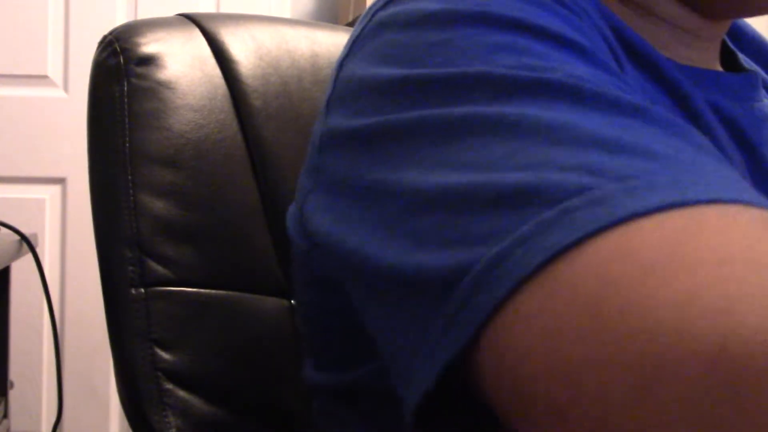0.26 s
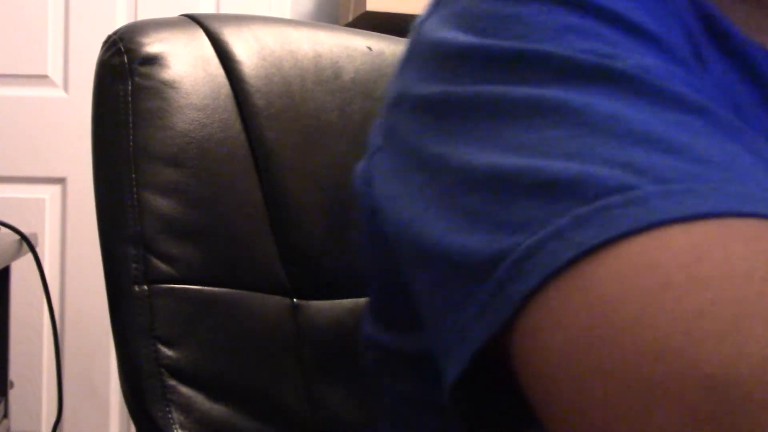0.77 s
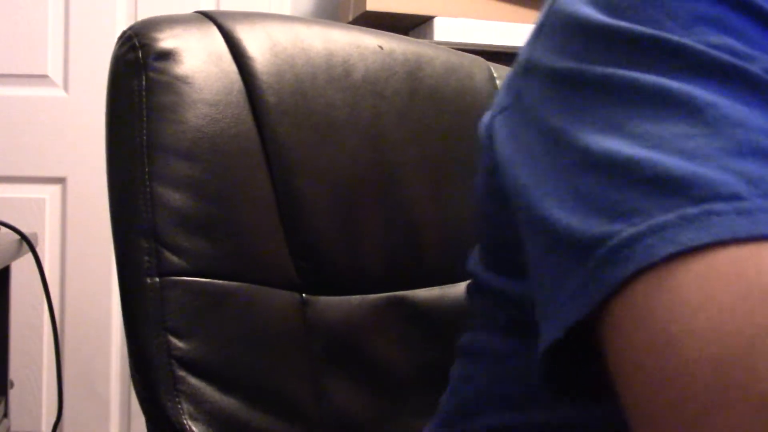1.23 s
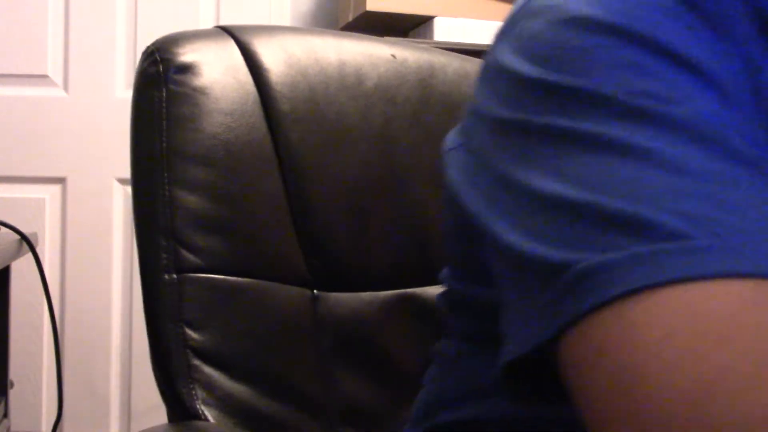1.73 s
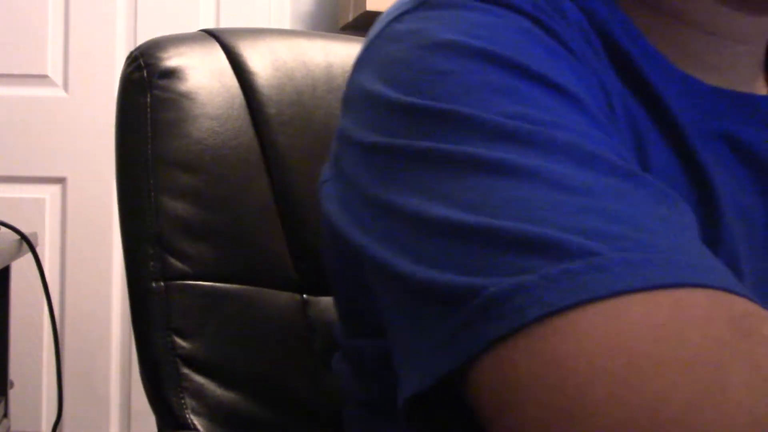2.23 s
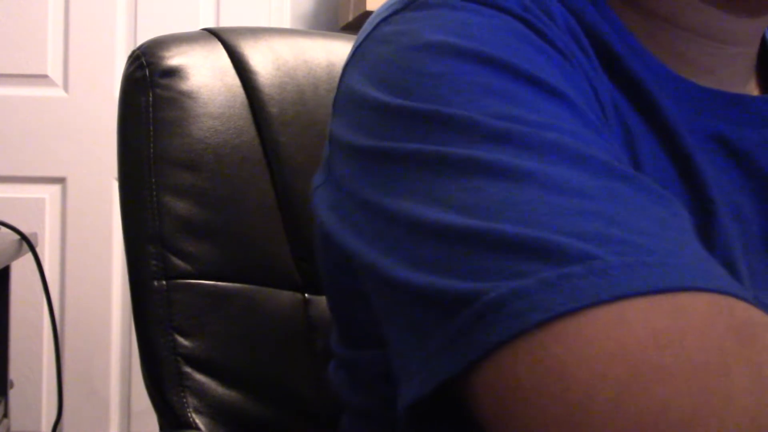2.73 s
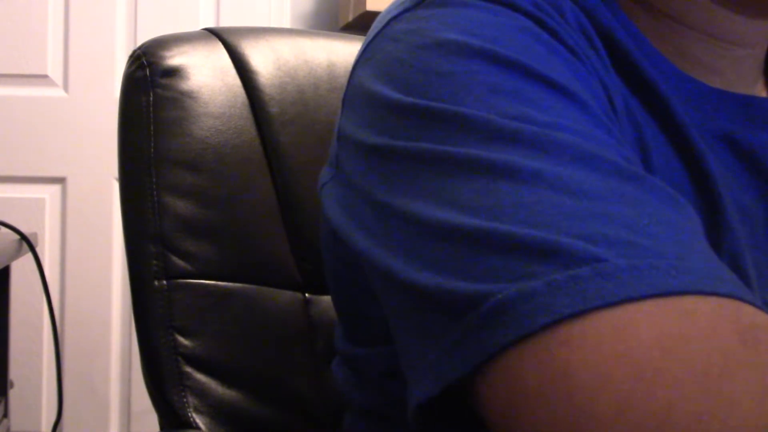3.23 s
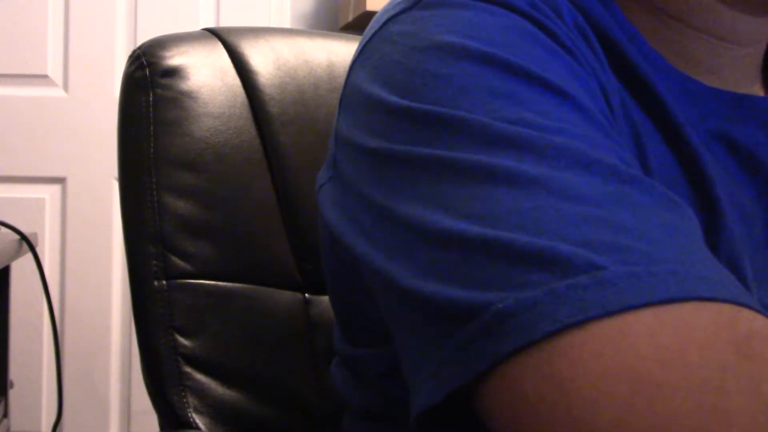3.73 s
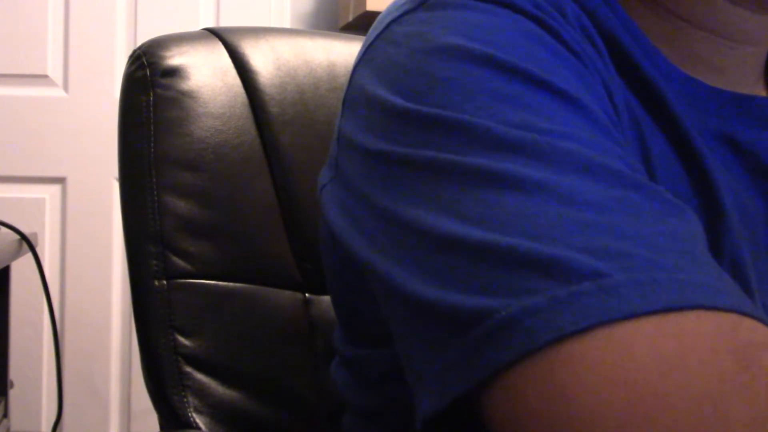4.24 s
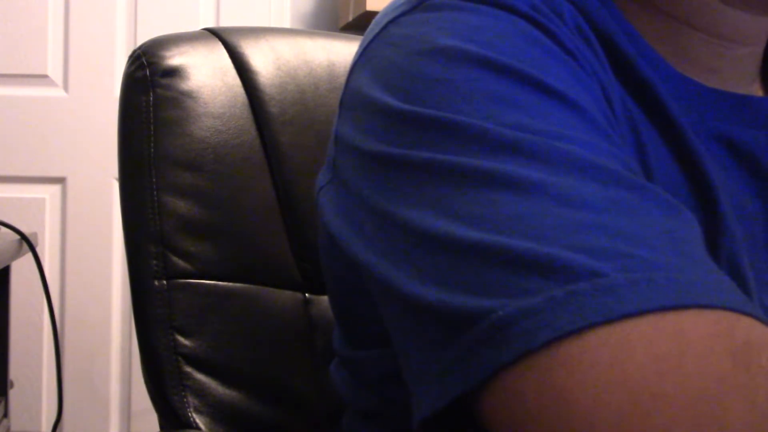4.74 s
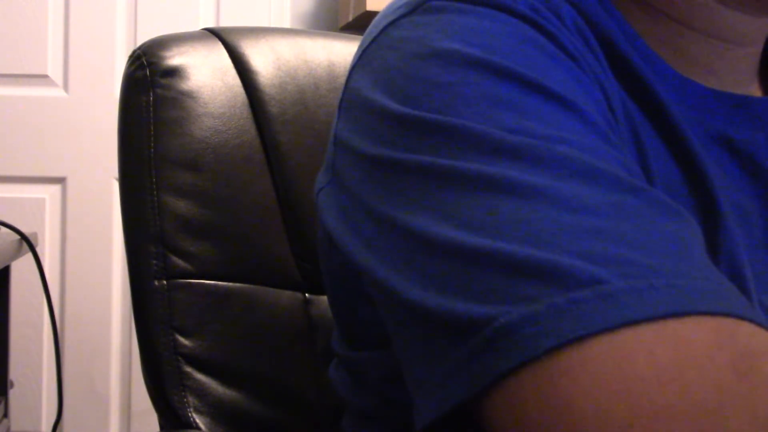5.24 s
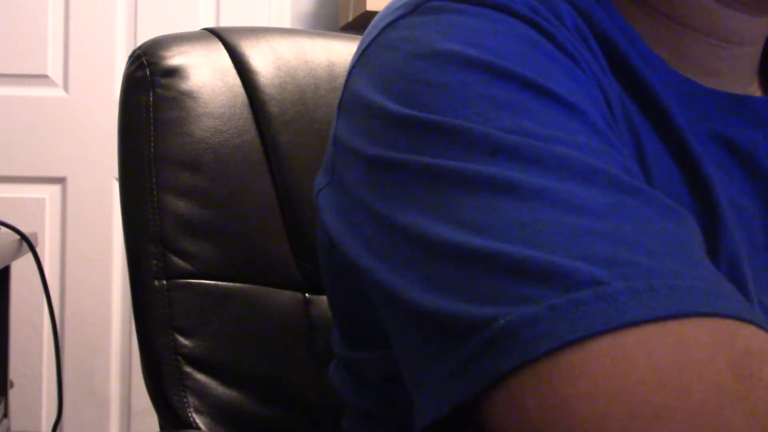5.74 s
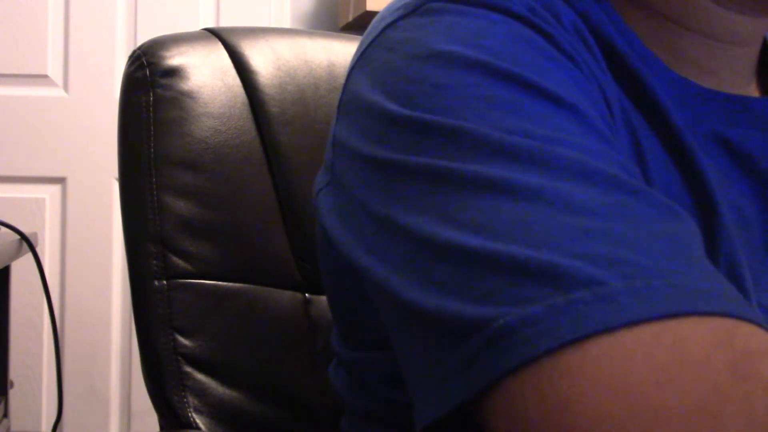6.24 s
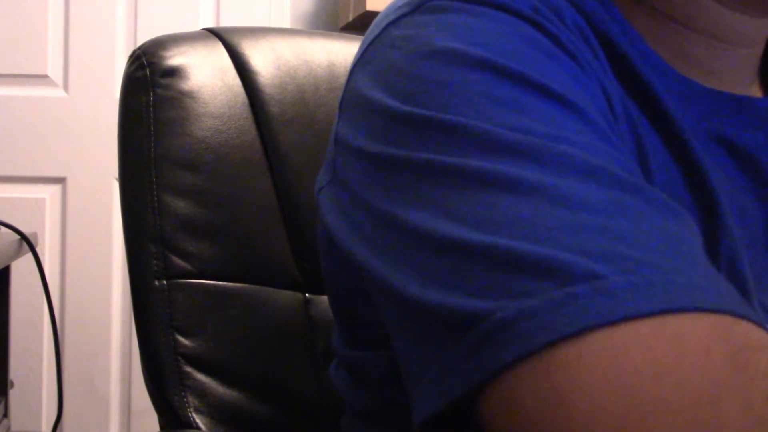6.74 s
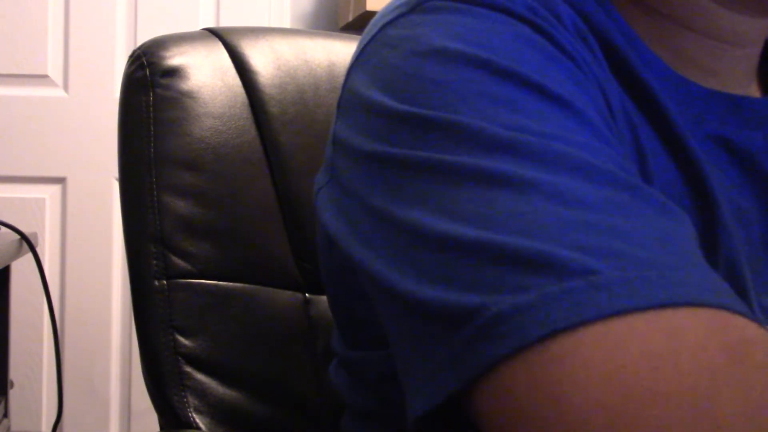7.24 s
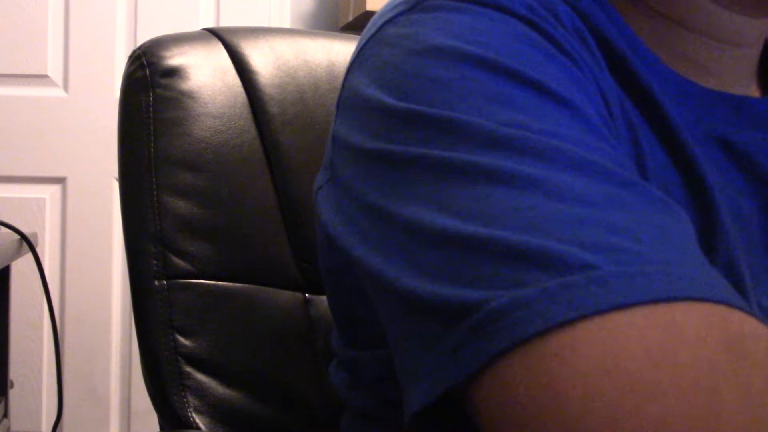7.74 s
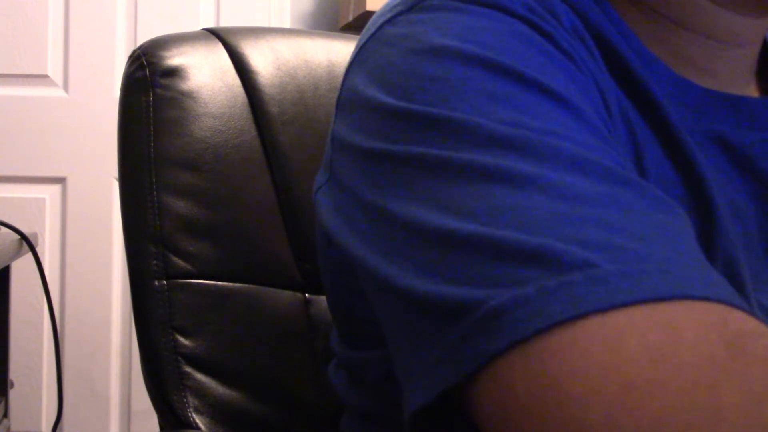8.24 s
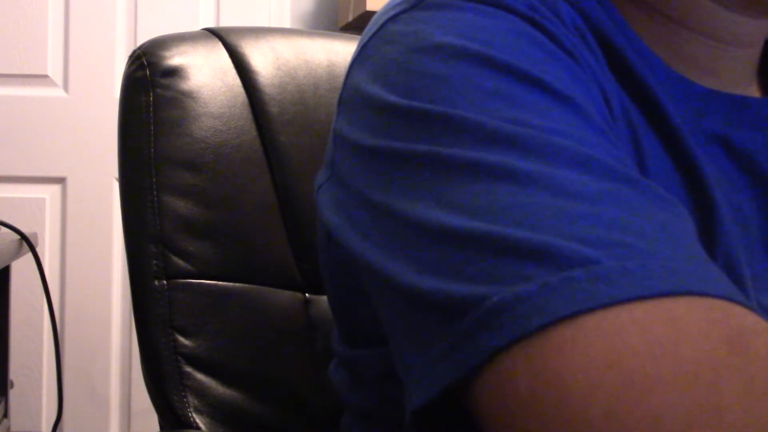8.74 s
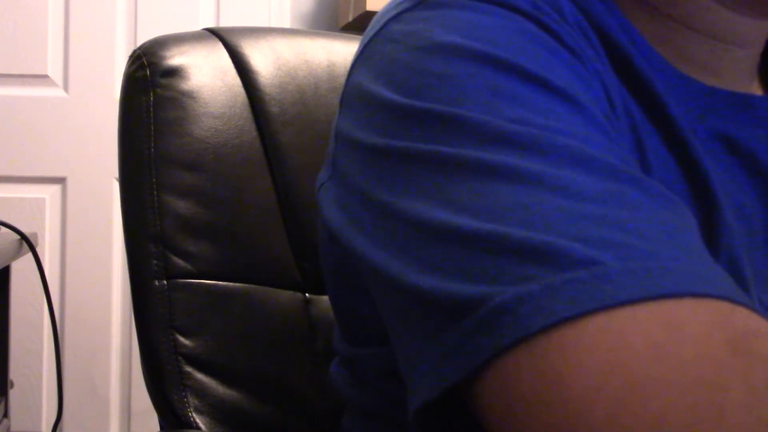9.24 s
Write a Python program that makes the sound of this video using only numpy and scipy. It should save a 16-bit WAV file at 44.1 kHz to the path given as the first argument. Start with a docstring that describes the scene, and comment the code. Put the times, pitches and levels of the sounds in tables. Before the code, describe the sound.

Close, dry typing on a clicky keyboard: each key knocks down with a small bright switch click, then springs back with a louder clack about a tenth of a second later. A sleeve rustles early and fades. Strokes come irregularly, with a quieter middle of faint taps and soft bumps, then firmer, busier typing. A low fan murmurs throughout a small indoor room.

```python
"""A fan hums throughout as shaped noise with fuzzy tones, in a small, quiet room. From the start a sleeve slides
over a chair as the typist leans across: cloth noise that wavers and then sinks to a faint rustle.
Short, irregular typing begins at once: bursts of chatter, coloured by case, desk and key, knock as each key goes
down and comes back up, and its switch clicks both ways. About a second later come loose finger taps and soft low
bumps (short decaying sines): the desk under some hard key presses, and chair, arm or wrist."""
import sys
import numpy as np
from scipy import signal
from scipy.fft import rfft, irfft
from scipy.io import wavfile
from scipy.ndimage import uniform_filter1d

SR = 44100
rng = np.random.default_rng(int(sys.argv[2]) if len(sys.argv) > 2 else 0)


def to_wav(sig):
    """Store sig (one row per channel, or 1-D mono) as 16-bit WAV at the path in sys.argv[1].

    Samples outside -1..1 are clipped; the rate is SR.
    """
    pcm = np.clip(np.atleast_2d(sig), -1, 1) * 32767
    pcm = np.round(pcm).astype(np.int16)
    wavfile.write(sys.argv[1], SR, pcm.T)  # frames by channels


N = 418509

SIZE = 16384  # samples in one short sound
HZ, AGE = np.fft.rfftfreq(SIZE, 1 / SR), np.arange(SIZE) / SR  # its frequencies [Hz] and running time [s]
FADE = signal.windows.tukey(2 * SIZE, .3)[SIZE:]  # eases its last 30 % down to silence


def amp(db):
    """Decibels to gain."""
    return 10 ** (np.asarray(db) / 20)


def evened(x):
    """Scales to rms 1."""
    return x / np.sqrt(np.mean(x ** 2) + 1e-20)


def unit(x):
    """Scales to energy 1."""
    return x / np.linalg.norm(x, axis=-1, keepdims=True)


def read(points, hz):
    """Joins (frequency [Hz], value) points on a log-frequency axis."""
    f, value = np.transpose(points)
    return np.interp(np.log(hz + 1), np.log(f + 1), value)


def lift(modes, hz):
    """The dB that resonances add to a spectrum; a negative lift is a dip."""
    total_db = 0
    for f, width, db in modes:
        detuning = 2 * (hz - f) / width
        total_db = total_db + 10 * np.log10(1 + (amp(db) ** 2 - 1) / (1 + detuning ** 2))
    return total_db


def add(mix, s, sound):
    """Mixes a sound in at time s [s]."""
    start = max(round(s * SR), 0)
    part = mix[:, start:][:, :sound.shape[1]]
    part += sound[:, :part.shape[1]]


def noise(colour_db, width):
    """Mid and side of steady noise with a given spectrum; the mid has rms 1."""
    hz = np.fft.rfftfreq(N, 1 / SR)
    mid, side = rfft(rng.standard_normal((2, N))) * amp(colour_db(hz))
    side = side * amp(read(width, hz))
    pair = irfft(np.array([mid, side]), N)
    return pair / pair[0].std()


# colour of fan and room air: (frequency [Hz], relative level per Hz [dB])
AIR_COLOUR = [(15, -63), (25, -25.5), (127, -9), (195, -11.5), (236, -5), (363, -9.5), (427, -15),
              (463, -8.5), (734, -16), (988, -15.5), (1100, -25), (1370, -17.5), (2160, -26), (3340, -25.5),
              (16000, -40.5)]
# fuzzy tones of the fan: (frequency [Hz], width [Hz], lift [dB])
FAN_TONES = [(142, 10, 2.2), (231, 4.6, 10.4), (358.5, 10, 4.2), (654, 19, 3.1), (1007, 57, 9.4),
             (1380, 46, 4.2), (1670, 87, 5.4), (3390, 29, 9)]
# stereo spread of the air: (frequency [Hz], side level [dB])
AIR_WIDTH = [(60, -18), (110, -12.5), (200, -17), (380, -10.5), (700, -9), (1290, -14.5), (2380, -5),
             (4400, -12), (8120, -13), (15000, -24.5)]
AIR_DB = -56  # rms of the mid, re full scale


def fan():
    """Soft moving air with a few fuzzy tones, as noise lifted by narrow resonances."""
    return amp(AIR_DB) * noise(lambda hz: read(AIR_COLOUR, hz) + lift(FAN_TONES, hz), AIR_WIDTH)


# sweep of the sleeve over the chair: (time [s], level [dB])
SLEEVE_SLIDE = [(0, -48), (.6, -56.5), (.9, -49.5), (1.3, -48), (1.6, -57.5), (2.25, -54), (2.7, -65.5)]
# colour of the rubbing cloth: (frequency [Hz], relative level per Hz [dB])
CLOTH_COLOUR = [(40, -25), (120, -2), (220, -1), (480, 5), (800, 0), (1300, -0.5), (2500, -6), (4000, -16),
                (7000, -18.5), (11000, -29.5), (16000, -46)]
# how much the room differs between the two microphones, also for strikes: (frequency [Hz], side level [dB])
ROOM_WIDTH = [(200, -25), (1000, -19.5), (2500, -15.5), (5000, -10), (12000, -7)]


def sleeve(catch_db=0.75):
    """Cloth slides over the chair back, catching a little as its level wavers."""
    slide_db = np.interp(np.arange(N) / SR, *np.transpose(SLEEVE_SLIDE))
    catches = evened(uniform_filter1d(rng.standard_normal(N), size=900))
    return amp(slide_db + catch_db * catches) * noise(lambda hz: read(CLOTH_COLOUR, hz), ROOM_WIDTH)


def causal(db):
    """The response that rings only after the blow, for a dB spectrum."""
    log_gain = np.log(amp(np.r_[db, db[-2:0:-1]]))
    return np.exp(np.conj(signal.hilbert(log_gain)))[:len(db)]


# how fast the room dies away: (frequency [Hz], time to fall 60 dB [s])
ROOM_DECAY = [(120, 0.24), (300, 0.24), (1200, 0.26), (4000, 0.3), (9000, 0.24), (15000, 0.34)]


def room_tails(rise_s=0.0035, clump_db=0.9):
    """Mid and side of a diffuse tail that builds up quickly, arrives in clumps and dies band by band."""
    hz, t, z = signal.stft(rng.standard_normal((2, SIZE)), SR, nperseg=256)
    decay = amp(-60 * t / read(ROOM_DECAY, hz)[:, None])
    tails = signal.istft(z * decay, SR, nperseg=256)[1][:, :SIZE]
    clumps = amp(clump_db * evened(uniform_filter1d(rng.standard_normal(SIZE), size=80)))
    build_up = 1 - np.exp(-(AGE / rise_s) ** 2)
    return unit(tails * clumps * build_up)


def strike(colour_db, rattle_s, onset_s, room_db, echo_db, echo_s=.009, late_echo_s=.0148):
    """A brief plastic chatter, a ceiling echo and a later echo, and the room tail, given one colour; returns
    mid and side."""
    contact = (1 - np.exp(-AGE / onset_s)) * np.exp(-(AGE / rattle_s) ** 4)
    chatter = rfft(unit(rng.standard_normal(SIZE) * contact))
    # level the chatter's broad humps before the room is added
    chatter *= causal(-10 * np.log10(uniform_filter1d(abs(chatter) ** 2, size=300) + 1e-9))
    early = np.exp(-2j * np.pi * HZ * echo_s)
    late = np.exp(-2j * np.pi * HZ * late_echo_s)
    echoes = amp(echo_db) * (early + 1.3 * late)
    tail, side = amp(room_db) * rfft(room_tails())
    mid = chatter * (1 + echoes) + tail
    # broad humps are levelled, so that chance sets only the fine grain of the colour
    humps_db = 10 * np.log10(uniform_filter1d(abs(mid) ** 2, size=110) + 1e-9)
    side = amp(read(ROOM_WIDTH, HZ)) * (side + chatter * echoes)
    return FADE * irfft(np.array([mid, side]) * causal(colour_db - humps_db))


def small_parts(count=10):
    """Stem, spring and housing give each contact its own few high resonances, as dB."""
    pitches_hz = np.geomspace(2900, 12500, count) * rng.uniform(.93, 1.07, count)
    ring_db = lift([(hz, 170, 6) for hz in pitches_hz], HZ)
    # lower the treble to offset what the resonances add
    return ring_db - read([(2000, 0.41), (3000, 2.82)], HZ)


# colour of a knock: (frequency [Hz], relative level [dB])
KNOCK_COLOUR = [(50, -32.5), (130, -17), (210, -14.5), (300, -5), (400, -13.5), (700, -3.5), (1200, -8.5),
                (1800, -3.5), (2600, -14.5), (3500, -17), (5500, -24), (7500, -26.5), (12500, -39.5),
                (15500, -52.5)]
# resonances of desk and case: (frequency [Hz], width [Hz], lift [dB])
CASE_MODES = [(145, 12, 6), (175.9, 7.9, 14), (279, 47, 8), (411, 15, 9), (517, 8.1, 6.5), (695, 57, 2.5),
              (925, 17, 7), (1146, 62, 8.5), (1286, 6.8, 5.5), (1348, 24, 8), (1480, 24, 3.5),
              (1560, 16, 5.5), (1680, 43, 2.5), (2040, 47, -2), (2533, 430, 6), (4840, 39, 6.5),
              (6760, 290, 3)]
# share of a contact's hardness that reaches each frequency: (frequency [Hz], share)
HARD_SHARE = [(1800, 0), (3300, 0.65), (8000, 1)]
# share of its desk thump that reaches each frequency: (frequency [Hz], share)
THUMP_SHARE = [(300, 0.97), (560, 0.14), (950, 0.074)]
RING_Q = 10.2  # sharpness of the plate and keycap rings
# the bite is the broad clack of the cap's plastic
BITE_HZ, BITE_WIDTH_HZ = 2460, 860
# a light touch rings mostly the cap's top: full lift up to strength 0 dB, gone by FIRM_DB
TICK_HZ, TICK_WIDTH_HZ, TICK_DB, FIRM_DB = 2200, 230, 5.5, 9


def knock_colour(contact, db, hard_db, bite_db, thump_db, plate_hz, cap_hz, plate_db, cap_db):
    """Every key rings the same case and desk, plus its own cap and the plate under it, as dB."""
    body_db = db + read(KNOCK_COLOUR, HZ) + lift(CASE_MODES, HZ)
    touch_db = read(contact, HZ) + hard_db * read(HARD_SHARE, HZ) + thump_db * read(THUMP_SHARE, HZ)
    tick_db = TICK_DB * np.clip(1 - db / FIRM_DB, 0, 1)
    rings = [(plate_hz, plate_hz / RING_Q, plate_db),
             (cap_hz, cap_hz / RING_Q, cap_db),
             (BITE_HZ, BITE_WIDTH_HZ, bite_db),
             (TICK_HZ, TICK_WIDTH_HZ, tick_db)]
    return body_db + touch_db + lift(rings, HZ) + small_parts()


# room mix of a knock, driest around 2600 Hz: (frequency [Hz], relative room level [dB])
ROOM_WETNESS = [(300, 0.5), (1200, 2.5), (2600, -4), (8000, 2.5)]


def knock(colour_db, rattle_s, room_db):
    """One contact of plastic on plastic, heard in the room."""
    wet_db = room_db + read(ROOM_WETNESS, HZ)
    return strike(colour_db, rattle_s, onset_s=0.00079, room_db=wet_db, echo_db=-13.0)


# colour of a switch snap: (frequency [Hz], relative level [dB])
SNAP_COLOUR = [(500, -9.5), (4000, -10), (6000, -8.5), (8000, -1), (10000, -1.5), (12200, -1),
               (14000, -13.5), (16000, -29.5)]


def snap(db, bright_db):
    """The small, bright click of a switch spring, tilted by bright_db per octave."""
    octaves = np.log2(np.clip(HZ, 3000, 13000) / 9000)
    colour_db = db + read(SNAP_COLOUR, HZ) + bright_db * octaves
    return strike(colour_db + small_parts(), rattle_s=0.0026, onset_s=0.00058, room_db=-2.5, echo_db=-11.5)


# keys going down: (landing time [s], relative landing level [dB], hardness [dB], bite [dB],
# snap delay after landing [s], snap level [dB], bottom delay after landing [s],
# relative bottom level [dB], bottom's desk thump [dB], plate ring [Hz], keycap ring [Hz])
KEY_PRESSES = [(.070, 4, 6, 1.5, 0.0055, -6.5, .014, 6.5, 10.5, 750, 1930),
               (0.3258, 5.5, -2, 0.5, 0.017, -1.5, 0.024, 9, 8, 1160, 1800),
               (1.3711, 15, 0, 3.5, .0118, -1.5, 0.025, 1, 9, 746, 2540),
               (1.632, 11.5, 10.5, -4.5, .0074, -1, 0.0079, 13, 8.5, 1150, 2410),
               (2.8244, 7, -5, 8.5, 0.0071, -1, 0.013, -3, -1, 725, 1720),
               (3.2386, -1.5, -1, 1, 0.018, -3, 0.021, 2.5, 4, 545, 2230),
               (3.5618, 2.5, 3.5, 3.5, .011, -7.5, 0.0052, 5, 2, 684, 2000),
               (3.738, 5.5, -1.5, 3, 0.019, -2.5, .012, 16.5, -20, 1160, 1890),
               (4.3285, -8, 2.5, -2, 0.017, -4.5, 0.014, -0.5, -2, 664, 2170),
               (5.4988, 11.5, -5, 0.5, .0052, -.5, 0.0083, 4, 13.5, 780, 2350),
               (5.7358, 15, 9, -1.5, 0.0026, -3, 0.0077, 7.5, 17, 710, 1500),
               (6.44, 0, -9, 1.5, .027, -4.5, 0.041, 2, 7, 670, 1140),
               (6.9398, -3.5, -3, 0, .0236, -5, 0.022, -4, 4, 696, 2250),
               (7.209, 4.5, 14.5, -0.5, 0.01, -2.5, 0.0093, 4.5, 19, 1120, 1880),
               (7.7882, 10, -3, -5, .010, -2.5, 0.0089, 5, 9, 1150, 2780),
               (7.973, 2.5, 1, -2, 0.0084, -1.5, 0.021, 4.5, 10, 970, 2180),
               (8.1876, 5.5, 9.5, -5, .012, 0, 0.011, 6.5, 9, 1100, 3330),
               (9.033, 6, -1, 5, 0.0088, -4.5, 0.013, 9, 5, 1290, 1700),
               (9.229, 14.5, -6.5, -2.5, .011, -5.5, 0.02, 8.5, 11, 1110, 2190)]
# tilt of a finger landing on the cap: (frequency [Hz], lift [dB])
LANDING_TILT = [(300, -2.5), (560, 0.5), (950, -2.5), (1800, 1.5), (3300, 4.5), (8000, 7)]
# tilt of a key hitting bottom: (frequency [Hz], lift [dB])
BOTTOMING_TILT = [(300, -2), (560, 4.5), (950, 3), (1800, -0.5), (3300, -0.5), (8000, 2)]
# a fast press snaps brighter: dB per octave of pitch for each halving of the usual travel time
USUAL_TRAVEL_S, SNAP_BRIGHTEN_DB = 0.021, 1.5


def presses(landing_db=-2.5, bottoming_db=-2.5, landing_thump=.65):
    """The finger clacks on the cap, then the switch snaps and the key thumps at its stop, in either order."""
    out = np.zeros((2, N))
    for s, db, hard, bite, snap_s, snap_db, bottom_s, bottom_db, thump, plate_hz, cap_hz in KEY_PRESSES:
        # a harder landing also thumps more
        landing = knock_colour(LANDING_TILT, db, hard, bite, landing_thump * hard, plate_hz, cap_hz,
                               plate_db=7.5, cap_db=7.5)
        bottom = knock_colour(BOTTOMING_TILT, bottom_db, hard, bite, thump, plate_hz, cap_hz,
                              plate_db=6.5, cap_db=4)
        bright_db = SNAP_BRIGHTEN_DB * np.log2(USUAL_TRAVEL_S / max(snap_s, .002))
        add(out, s, knock(landing_db + landing, rattle_s=0.0048, room_db=0.0))
        add(out, s + snap_s, snap(snap_db, bright_db))
        add(out, s + bottom_s, knock(bottoming_db + bottom, rattle_s=0.0049, room_db=-1.5))
    return out


# keys springing back against their stops: (knock time [s], relative strength [dB], hardness [dB], bite [dB],
# reset lead before the knock [s], reset level [dB], desk thump [dB], plate ring [Hz], keycap ring [Hz])
KEY_RELEASES = [(0.1552, 20, -2, 3, 0.0059, -18, -10.5, 720, 2120),
                (0.4261, 14.5, -2, -6, 0.012, -11.5, -7.5, 1190, 1900),
                (1.4589, 21.5, 1.5, 0, 0.012, -15, -8.5, 670, 2330),
                (1.7135, 30.5, 2.5, 0.5, 0.0017, -12, -1.5, 1030, 1550),
                (2.915, 20.5, -2, 3, .007, -13, -10, 1470, 2820),
                (3.3543, -2, -4, 3.5, 0.024, -9.5, -2, 1060, 2220),
                (3.6631, 8, 0.5, 6, .009, -19, 3, 1120, 1480),
                (3.753, 20.5, -3, 0, 0.0043, -14, -27, 1210, 1920),
                (3.803, 19, -10, -4, 0.0053, -11, -7.5, 656, 1230),
                (3.864, 12, -5, -4, .022, -13.5, -8, 1140, 1280),
                (4.447, -2.5, 0, -1, 0.02, -10.5, -5, 1470, 2230),
                (5.5862, 24, 0, 2.5, 0.0054, -18, -8, 1260, 1760),
                (5.851, 22.5, 3.5, -1.5, 0.0035, -15, 1.5, 1030, 1360),
                (6.5891, 4.5, 2.5, 0, .001, -14.5, -10, 745, 1950),
                (7.0746, -4, 1, 2.5, .026, -11, -18, 1470, 2200),
                (7.2989, 20.5, 5, -10, 0.0022, -15, -2, 700, 1160),
                (7.8821, 20.5, -2.5, 2.5, 0.0068, -10.5, -5, 610, 1400),
                (8.096, -0.5, 1, 0, 0.026, -14, 3.5, 730, 2110),
                (8.2944, 24, 2.5, -1, 0.0023, -15, -0.5, 506, 1090),
                (9.1316, 13, -2.5, 5, 0.0073, -14.5, -3.5, 780, 1680),
                (9.365, 10.5, -2, -4, 0.013, -15, -7, 1120, 1520)]
# tilt of a key meeting its upper stop: (frequency [Hz], lift [dB])
REBOUND_TILT = [(300, -1), (390, -0.5), (500, 2), (680, 0), (950, 0), (1800, -0.5), (3300, -1.5),
                (8000, -0.5)]
RESET_BRIGHT_DB = -2.5  # tilt of the reset tick per octave
# the stem scuffs its guide just before the stop; the scuff gains SCUFF_GROWTH of the knock's strength
SCUFF_LEAD_S, SCUFF_DB, SCUFF_GROWTH = 0.0046, -8, 0.45


def releases(level_db=-1.0):
    """The switch ticks as it resets, and the rising key scuffs its guide and knocks against its stop."""
    out = np.zeros((2, N))
    for s, db, hard, bite, reset_s, reset_db, thump, plate_hz, cap_hz in KEY_RELEASES:
        colour_db = level_db + knock_colour(REBOUND_TILT, db, hard, bite, thump, plate_hz, cap_hz,
                                            plate_db=5.5, cap_db=5)
        scuff_db = colour_db + SCUFF_DB - (1 - SCUFF_GROWTH) * db
        add(out, s - reset_s, snap(reset_db, RESET_BRIGHT_DB))
        add(out, s - SCUFF_LEAD_S, knock(scuff_db, rattle_s=0.0036, room_db=-1.0))
        add(out, s, knock(colour_db, rattle_s=0.0044, room_db=-2.0))
    return out


# soft low bumps, the desk under some hard key presses, and chair, arm or wrist:
# (time [s], level [dB], pitch [Hz])
SOFT_BUMPS = [(1.09, -51, 115), (1.15, -56, 149), (1.645, -37, 185), (4.809, -58, 218), (5.06, -51.5, 231),
              (5.411, -49, 212), (5.744, -33, 172), (8.204, -41, 170)]


def bumps(swell_s=0.0079):
    """Dull, low thuds: sines that swell and die away, with no side signal."""
    out = np.zeros((2, N))
    swell = AGE / swell_s * np.exp(1 - AGE / swell_s)
    for s, db, hz in SOFT_BUMPS:
        thud = amp(db) * swell * np.sin(2 * np.pi * hz * AGE)
        add(out, s, np.array([thud, 0 * thud]))
    return out


# fingers bumping the keyboard without working a switch: (time [s], relative strength [dB], hardness [dB],
# bite [dB], desk thump [dB], plate ring [Hz], keycap ring [Hz])
FINGER_TAPS = [(1.2247, 14.5, 2.5, -2.5, -0.5, 494, 2290), (1.5715, 9.5, 1.5, -3, 5, 850, 1180),
               (1.592, 6.5, -1, 2, -1, 960, 1860), (4.392, -1.5, 4, -1, -3, 1460, 2150),
               (4.694, -7, -8, -9, -1, 1000, 1660), (4.8815, -4.5, 5, 1.5, -12, 1280, 1820),
               (5.158, -17, -5, -1, -5, 700, 1750), (6.321, -17, -3, -3, -5, 1000, 2080),
               (8.046, -1, 0, -0.5, -1, 1200, 1950), (8.986, -17, 5, 2, -5, 1000, 1750)]
# tilt of a loose tap: (frequency [Hz], lift [dB])
TAPPING_TILT = [(300, -2.5), (560, 3.5), (950, -2.5), (1800, -1.5), (3300, -1), (8000, -7.5)]


def taps(level_db=-2.0):
    """Loose, dull knocks of a finger on the keyboard, with no snap."""
    out = np.zeros((2, N))
    for s, db, hard, bite, thump, plate_hz, cap_hz in FINGER_TAPS:
        colour_db = knock_colour(TAPPING_TILT, db, hard, bite, thump, plate_hz, cap_hz,
                                 plate_db=11.0, cap_db=9.0)
        add(out, s, knock(level_db + colour_db, rattle_s=.0045, room_db=4))
    return out


# stereo lean of the near sounds: (frequency [Hz], left minus right [dB])
STEREO_LEAN = [(300, 0), (1400, -.8), (2800, -1), (5000, -2.6), (13000, -2.3)]


def scene():
    """The keyboard sits a little to the right; mid and side become left and right."""
    air, air_side = fan()
    mid, side = sleeve() + presses() + releases() + bumps() + taps()
    hz = np.fft.rfftfreq(N, 1 / SR)
    # phase of left against right [radians]; negative, so the left comes later
    lag = read([(300, -0.16), (2000, -0.058), (5000, -0.19), (12000, -0.28)], hz)
    lean = amp(read(STEREO_LEAN, hz) / 2) * np.exp(.5j * lag)
    left = rfft(mid + side) * lean
    right = rfft(mid - side) / lean
    near = irfft(np.array([left, right]), N)
    return near + np.array([air + air_side, air - air_side])


EDGE_HZ = 16100  # upper edge of the band


def record(dry):
    """Rounds off the hardest peaks towards 0.85 of full scale, then limits the band."""
    rounded = dry / (1 + (dry / .85) ** 4) ** .25
    low_pass = signal.firwin(511, EDGE_HZ, window=("kaiser", 9), fs=SR)
    return signal.oaconvolve(rounded, low_pass[None], "same", axes=1)


dry = scene()
out = record(dry)
to_wav(out)
```